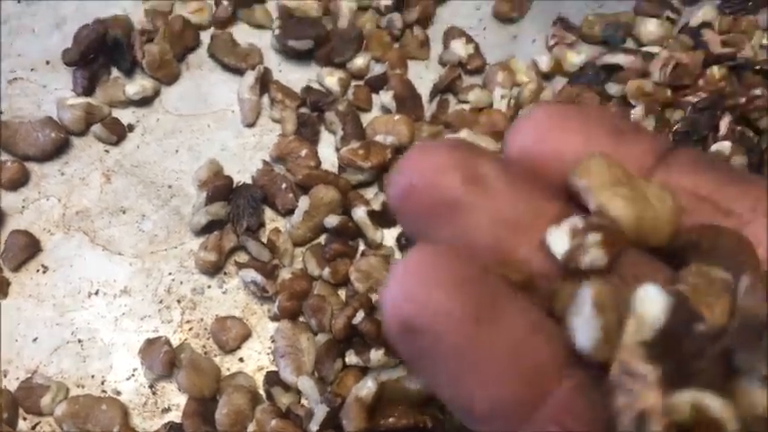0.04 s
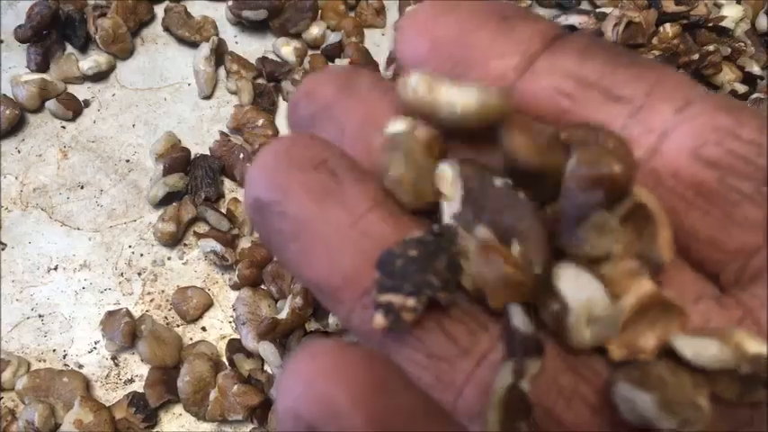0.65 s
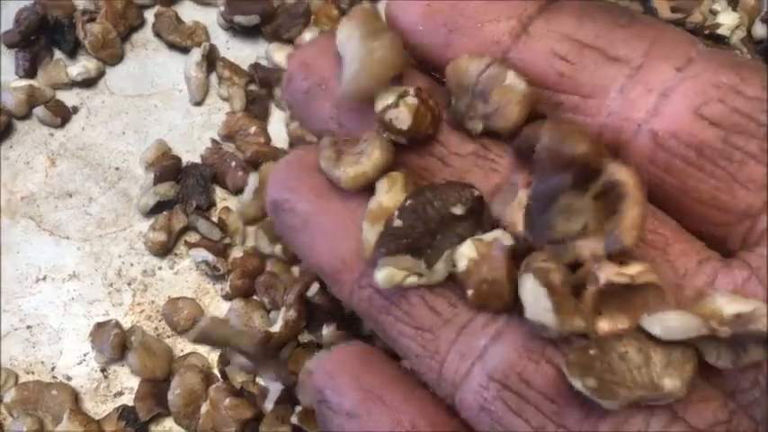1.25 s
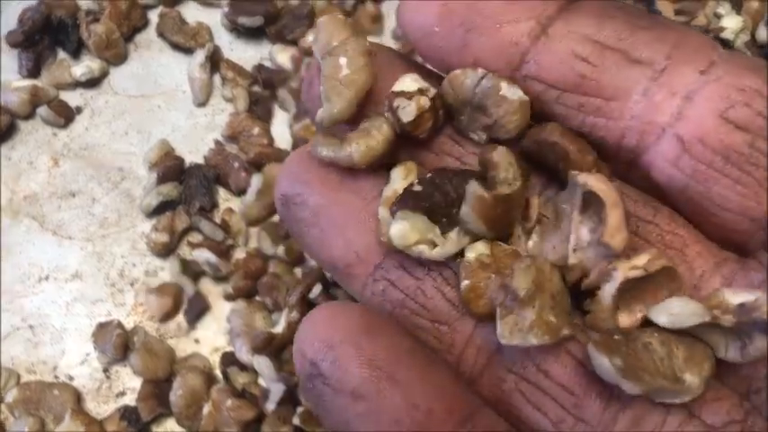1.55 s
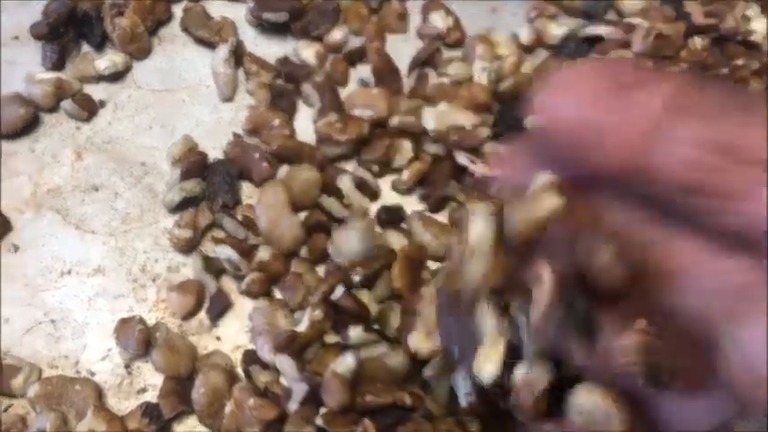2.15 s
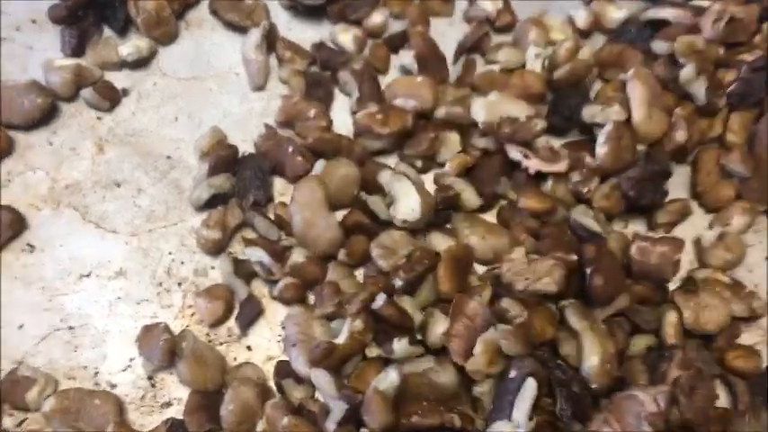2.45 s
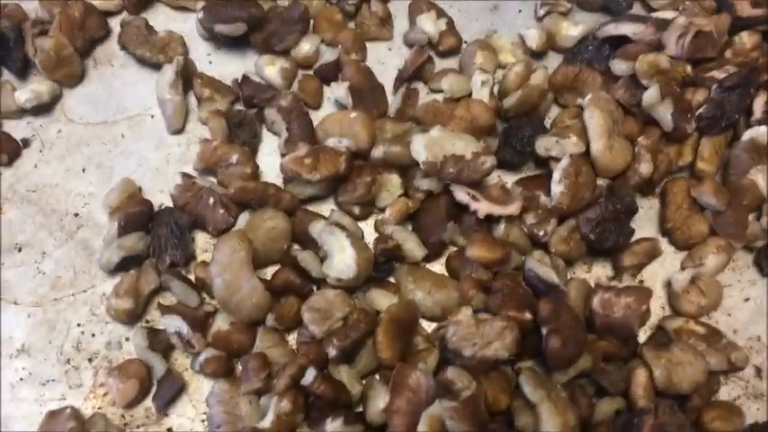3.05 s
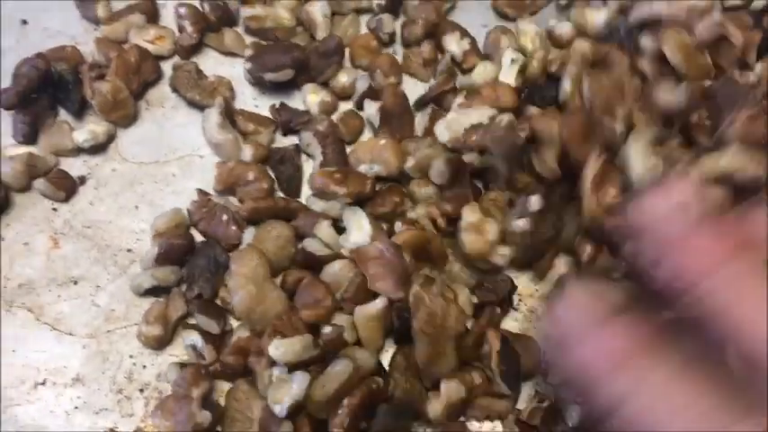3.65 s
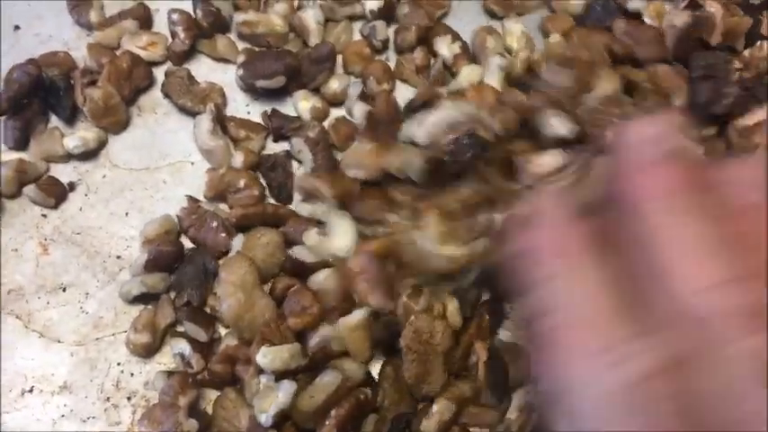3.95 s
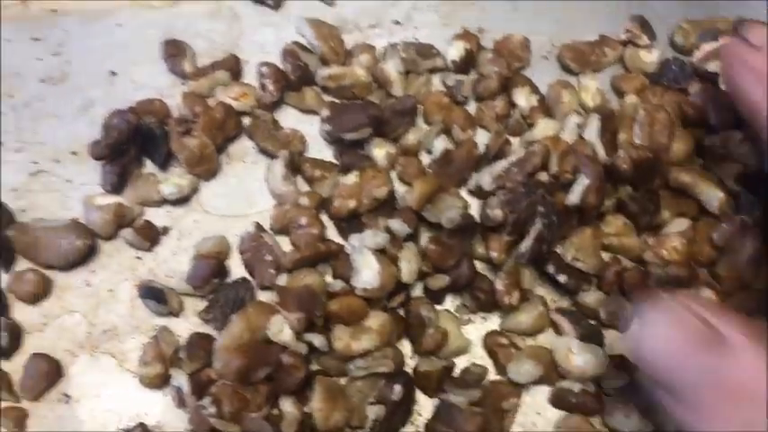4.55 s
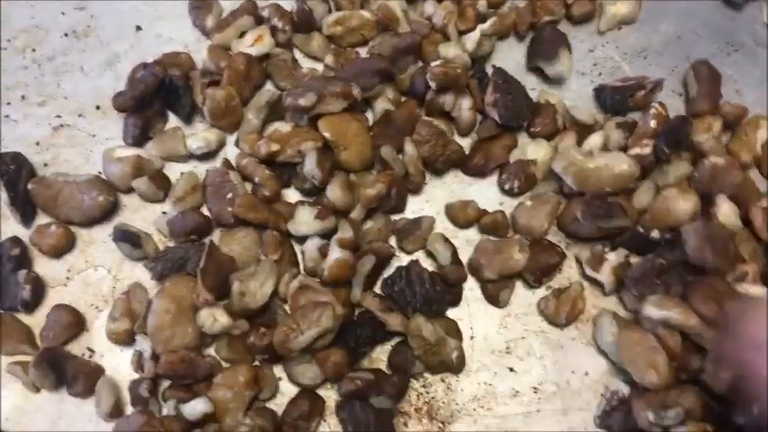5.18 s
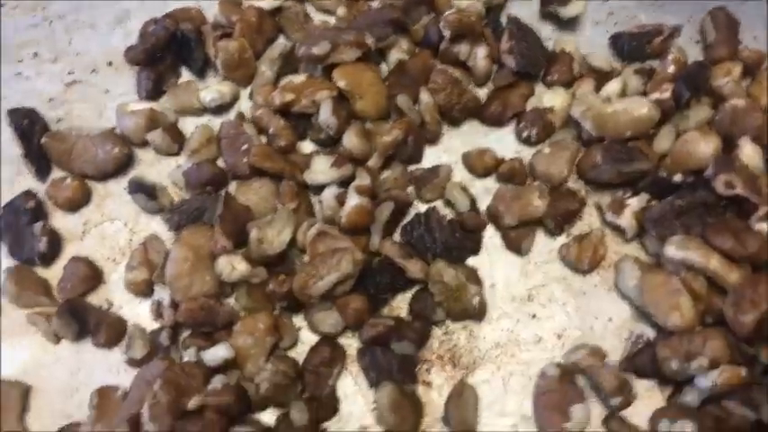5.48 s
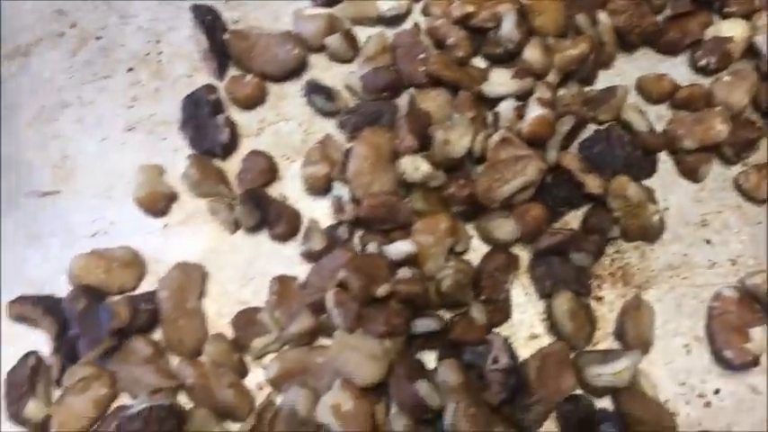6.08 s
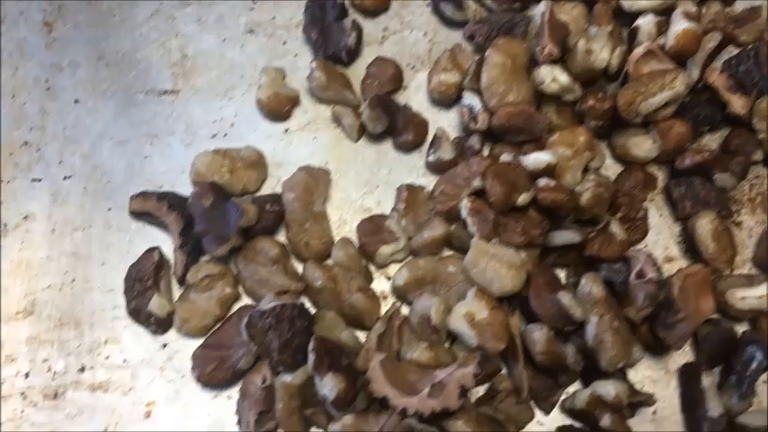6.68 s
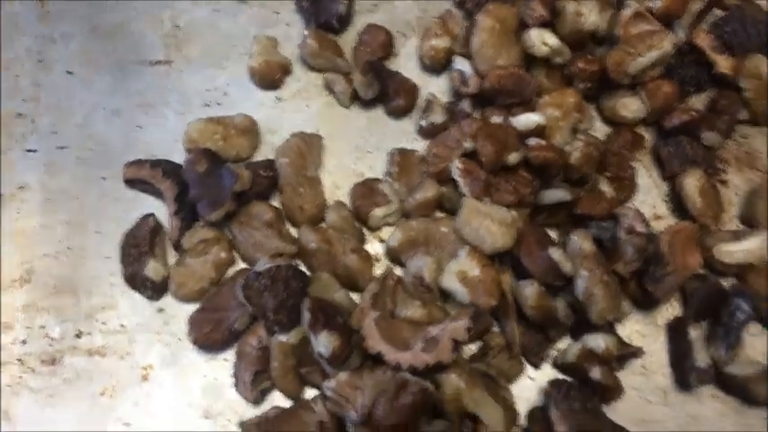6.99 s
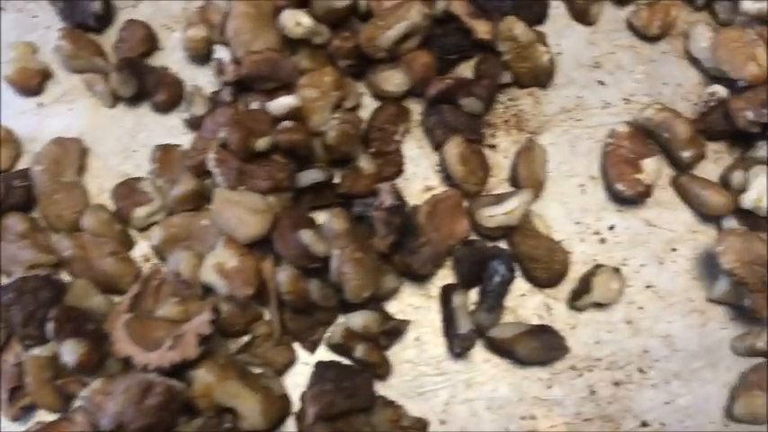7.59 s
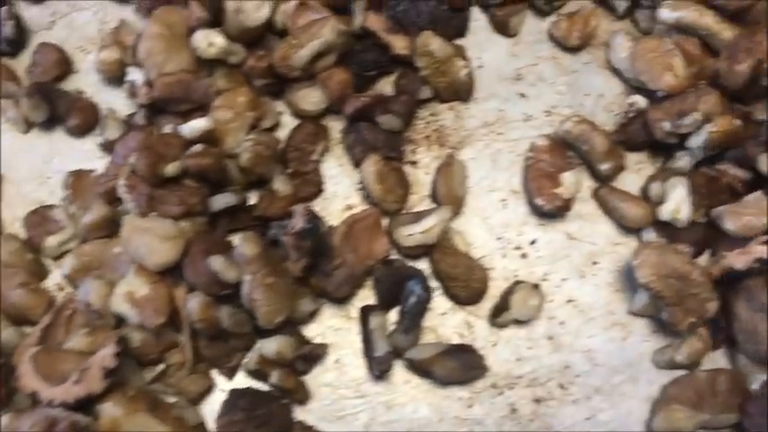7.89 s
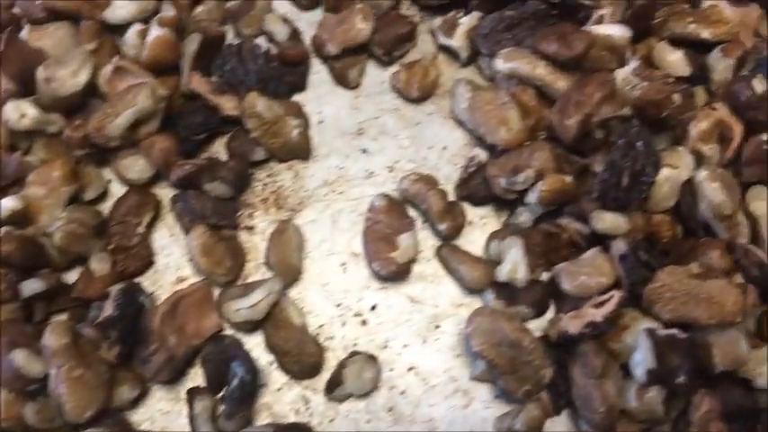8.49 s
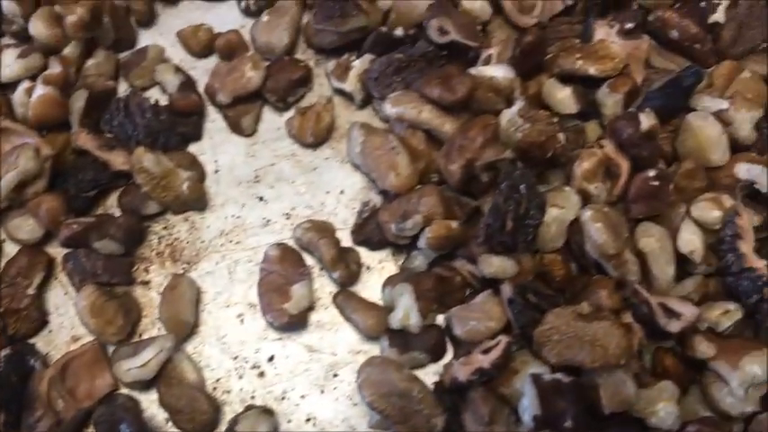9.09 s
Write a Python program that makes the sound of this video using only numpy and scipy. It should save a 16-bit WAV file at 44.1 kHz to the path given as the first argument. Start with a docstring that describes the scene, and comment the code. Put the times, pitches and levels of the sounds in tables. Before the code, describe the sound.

A few dry cracked nut pieces slip off a palm and knock on the bottom of a hard tub, which rings briefly. The rest of the handful drops in a short clatter. Then the hand rakes through the heap in several quick pushes, a dense rattle with sharp clicks of shell on shell. The pieces settle, leaving a faint low hum. Heard close up in a small room.

```python
"""Cracked nuts in a hard tub

Close by, in a small room with a low hum, a few pieces slip off an open palm and knock on the
bottom, making the tub ring. Then the handful is tipped back. The hand rakes through the heap in
a few quick pushes: a dense rattle with sharp clicks of shell on shell, settling after each."""
import sys
import numpy as np
from scipy import signal
from scipy.fft import rfft, irfft, next_fast_len
from scipy.io import wavfile

SR = 44100
rng = np.random.default_rng(int(sys.argv[2]) if len(sys.argv) > 2 else 0)


def put_to_file(sound):
    """Save the sound as 16-bit audio at rate SR, in the file named by the first command-line argument."""
    columns = np.atleast_2d(sound).T  # one column per channel
    safe = np.clip(columns, -1, 1)
    whole_steps = np.round(safe * 32767)
    wavfile.write(sys.argv[1], SR, whole_steps.astype(np.int16))


N = 411453
T = np.arange(N) / SR   # seconds since the scene began
AGE = np.arange(2048) / SR   # seconds since a hit
SHELL_RING_S = .008

# The tub's ringing tones. Each row: pitch in Hz, relative level in dB, seconds to fade by 60 dB.
TUB_TONES = [(251.3, -8.5, 0.23), (579, -10, 0.023), (618, -5, 0.11), (795, -8.5, 0.047), (997, -5.5, 0.06),
             (1300.6, 2, 0.036), (1514, 0, 0.015), (1710, -1, 0.0062), (2053, 0.5, 0.019),
             (2300, -3.5, 0.028), (2684, -1.5, 0.036), (3110, -3.5, 0.035), (3540, -19.5, 0.022)]
# The dry crack of a piece on the tub. Each row: frequency in Hz, relative level in dB.
CRACK_SPECTRUM = [(100, -19), (260, -6), (430, -13), (620, 2.5), (1000, 0), (1500, -2.5), (2100, -5),
                  (3600, -8.5), (4600, -20), (9000, -35)]


def from_db(db):
    """Turn decibels into a factor to multiply by."""
    return 10 ** (np.asarray(db) / 20)


def unit(x):
    """Scale a sound to a total energy of one."""
    return x / np.sqrt(np.sum(x * x) + 1e-20)


def rms_one(x):
    """Scale a sound to an average power of one."""
    return unit(x) * np.sqrt(len(x))


def at_hz(points, hz):
    """Look up a frequency in a table, blending between rows on a scale of octaves."""
    frequencies, values = np.transpose(points)
    return np.interp(np.log(np.maximum(hz, 1)), np.log(frequencies), values)


def colour(x, spectrum):
    """Filter a sound by a list of (Hz, dB) points."""
    n = 2 * next_fast_len(len(x) // 2 + len(AGE))
    gains = from_db(at_hz(spectrum, np.arange(n // 2 + 1) * SR / n))
    cepstrum = irfft(np.log(gains))
    cepstrum[1:n // 2] *= 2   # using only this half, doubled, keeps sound from coming before its hit
    response = np.exp(rfft(cepstrum[:n // 2], n))
    return irfft(rfft(x, n) * response)[:len(x)]


def ring(x, hz, ring_s):
    """Let a sound set off one tone, which fades by 60 dB in ring_s seconds."""
    decay = from_db(-60 / (ring_s * SR))
    angle = 2 * np.pi * min(hz, .45 * SR) / SR
    return signal.lfilter([.5, 0, -.5], [1, -2 * decay * np.cos(angle), decay * decay], x + 1e-18)


def background(air_db=-55.5, hum_db=-2, ring_s=.4):
    """Steady room air and a low hum that wavers."""
    # The hiss of the air. Each row: frequency in Hz, relative level in dB.
    air_spectrum = [(28, -34), (55, -7), (160, -3), (200, -9.5), (380, -11.5), (520, -20.5), (750, -26.5),
                    (1000, -25), (2100, -34.5), (2500, -33.5), (4700, -42), (9000, -41.5), (15000, -37)]
    # The tones of the hum. Each row: pitch in Hz, level in dB before hum_db is added.
    hum_tones = [(64.6, -57.5), (102.3, -64), (150.7, -67.5)]
    air = from_db(air_db) * rms_one(colour(rng.standard_normal(N), air_spectrum))
    noise, hum = rng.standard_normal(N + SR), 0   # an extra second lets the hum build up
    for hz, db in hum_tones:
        tone = ring(ring(noise, hz, ring_s), hz, ring_s)[SR:]
        hum += from_db(db + hum_db) * rms_one(tone)
    return air + hum


def scatter(seconds, echo_db=-17, echo_s=0.012):
    """One contact is a tight cluster of tiny hits that echoes off the tub walls."""
    shape = np.exp(-(AGE / seconds) ** 2) + from_db(echo_db) * np.exp(-AGE / echo_s)
    return unit(rng.standard_normal(len(AGE)) * shape)


def knock(brightness_hz, crack_s=0.0059, ring_db=-4):
    """A piece hits the tub: a dry crack, and tones whose strengths depend on where it lands."""
    touch = scatter(crack_s / 2)
    tones = sum(from_db(db) * unit(ring(touch, hz, ring_s)) * rng.uniform(0.55, 1.5)
                for hz, db, ring_s in TUB_TONES)
    crack = unit(colour(scatter(crack_s), CRACK_SPECTRUM))
    sound = crack + from_db(ring_db) * unit(tones)
    tilt_db = 9 * np.log2(brightness_hz / 1400)   # heavy pieces favour low tones, light ones high
    return unit(colour(sound, [(600, -tilt_db), (3000, tilt_db)]))


def click(pitch_hz, snap_s=.003, ring_db=-3, count=7):
    """Shell hits shell: a bright snap and a few brief tones around the piece's pitch."""
    spectrum = [(pitch_hz / 8, -27), (pitch_hz * .6, -4), (pitch_hz, 0), (pitch_hz * 2, -10)]
    snap = colour(scatter(snap_s), spectrum)
    ratios = np.geomspace(.65, 1.4, count) * rng.uniform(.88, 0.99, count)
    tones = sum(unit(ring(snap, pitch_hz * ratio, SHELL_RING_S)) for ratio in ratios)
    return unit(unit(snap) + from_db(ring_db) * unit(tones))


def single_pieces(gain_db=24, click_hz=7755, db_per_octave=54.5):
    """Each piece that lands or collides sounds both the tub and the shell."""
    # The hits that stand out. Each row: start in seconds, relative knock level in dB,
    # knock brightness in Hz, relative click level in dB.
    contacts = [(0.001, -24, 2140, -71), (0.594, -37.5, 1080, -51), (0.602, -37, 690, -68),
                (0.667, -50.5, 1750, -82), (0.967, -36, 980, -50), (1.429, -18.5, 1260, -56),
                (1.475, -41, 822, -56), (1.501, -40, 1710, -50), (1.522, -32, 1200, -59),
                (1.535, -40.5, 1150, -67), (1.71, -65, 1150, -52.5), (1.748, -72, 881, -46.5),
                (1.865, -17.5, 1210, -33.5), (1.879, -17.5, 1220, -26.5), (2.247, -23.5, 1082, -34),
                (2.288, -27.5, 992, -34), (2.303, -27.5, 886, -47.5), (2.323, -26.5, 1350, -49.5),
                (2.329, -26, 1060, -41.5), (2.336, -21.5, 1390, -39.5), (2.343, -46, 1540, -22),
                (2.373, -20, 1450, -17), (2.383, -18.5, 1410, -43), (2.512, -41.5, 960, -56),
                (2.53, -40, 2020, -55), (2.556, -45, 980, -57), (3.467, -35, 1500, -46),
                (3.603, -38.5, 1980, -14.5), (3.624, -20, 2037, -18.5), (3.644, -22, 2157, -18.5),
                (3.696, -21.5, 1540, -34.5), (3.756, -28.5, 1870, -19), (3.761, -26, 1985, -21),
                (3.774, -42, 1840, -26.5), (4.023, -25.5, 2410, -14), (4.101, -25.5, 2080, -18),
                (4.141, -26.5, 1550, -16), (4.193, -29.5, 1428, -22.5), (4.257, -29.5, 1750, -28.5),
                (4.323, -26.5, 1900, -25), (4.344, -15.5, 1806, -27), (4.361, -13, 2033, -12.5),
                (4.475, -35, 1990, -25), (4.499, -31, 1860, -23.5), (4.533, -23.5, 2140, -18),
                (4.579, -28, 2140, -14), (4.614, -32.5, 1735, -64), (4.685, -39.5, 1084, -67.5),
                (4.717, -29, 1920, -34.5), (4.976, -20.5, 1586, -41), (4.994, -19, 2275, -13.5),
                (5.058, -21, 2110, -30.5), (5.075, -23.5, 1780, -17.5), (5.132, -16, 2450, -14.5),
                (5.231, -25, 2280, -23), (5.28, -25, 1070, -32.5), (5.294, -29, 750, -54.5),
                (5.362, -28.5, 870, -73), (5.381, -28, 840, -67), (5.441, -37, 1220, -70),
                (5.465, -30.5, 810, -65), (7.76, -70, 2400, -70)]
    out = np.zeros(N + len(AGE))
    for start_s, knock_db, brightness_hz, click_db in contacts:
        at = round(start_s * SR)
        # a glancing hit has more click than knock, and clicks higher the more that is so
        pitch_hz = click_hz * 2 ** ((click_db - knock_db) / db_per_octave)
        out[at:at + len(AGE)] += from_db(knock_db + gain_db) * knock(brightness_hz)
        out[at:at + len(AGE)] += from_db(click_db + gain_db) * click(pitch_hz)
    return out[:N]


def collisions(per_s, spread_db):
    """Hits at random moments, most of them small."""
    at = np.flatnonzero(rng.random(N) < per_s / SR)
    size, sign = rng.random((len(at), 2)).T
    hits = np.zeros(N)
    hits[at] = from_db(spread_db * np.minimum(-np.log(size), 3)) * np.sign(sign - .5)
    return hits


def swell(middle_s, half_s):
    """A smooth rise to one and back down."""
    return np.exp(-np.minimum(((T - middle_s) / half_s) ** 2, 50))


def palm_rustle(gain_db=-3, held_db=-73.5, held_until_s=2.25):
    """Dry pieces rustle faintly while they lie on the palm, and more as they slide over the skin."""
    # The slides. Each row: middle in seconds, half length in seconds, relative level in dB.
    slides = [(0.29, 0.057, -61.5), (0.5, 0.058, -69), (0.656, 0.025, -58), (0.793, 0.069, -54.5),
              (1.14, .04, -65), (1.38, 0.1, -60), (1.83, 0.16, -55), (2.186, 0.084, -59.5),
              (2.732, 0.091, -64.5), (5.8, 0.055, -64), (6.6, .04, -68)]
    # Shell rubbing on skin. Each row: frequency in Hz, relative level in dB.
    skin_spectrum = [(2000, -3.5), (4500, -8.5), (6000, 0), (9000, 0.5), (10500, -3.5), (12500, 5),
                     (16000, -4)]
    held = from_db(held_db) * (T < held_until_s)
    sliding = sum(from_db(db) * swell(middle_s, half_s) for middle_s, half_s, db in slides)
    grains = rms_one(colour(collisions(per_s=2500, spread_db=5), skin_spectrum))
    return from_db(gain_db) * (held + sliding) * grains


def push(start_s, attack_s, length_s, sag_db_per_s, settle_db_per_s):
    """The heap gathers speed, sags as the hand slows, and settles once the hand stops."""
    age = T - start_s
    sag_db = sag_db_per_s * np.maximum(age - attack_s, 0)
    settle_db = settle_db_per_s * np.maximum(age - length_s, 0)
    return np.clip(age / attack_s, 0, 1) * from_db(-np.minimum(sag_db + settle_db, 120))


def tub_rattle(crack_db=-2):
    """Many pieces tumble over the bottom, all setting off the same tones of the tub."""
    hits = collisions(per_s=1200, spread_db=3)
    at = np.flatnonzero(hits)
    drive, tones = np.zeros(N), 0
    for hz, db, ring_s in TUB_TONES:
        drive[at] = hits[at] * rng.standard_normal(len(at))   # each landing spot favours other tones
        tones += from_db(db) * unit(ring(drive, hz, ring_s))
    cracks = unit(colour(hits, CRACK_SPECTRUM))
    return rms_one(unit(tones) + from_db(crack_db) * cracks)


def crackle(hits, decay_s=0.0018):
    """Each hit becomes a brief noisy snap."""
    energy = signal.lfilter([1], [1, -np.exp(-1 / (decay_s * SR))], hits ** 2 + 1e-18)
    return np.sqrt(energy) * rng.standard_normal(N)


def shell_rattle(count=16):
    """Shells of many pitches bump together inside the heap, snapping and ringing."""
    # The jostling shells. Each row: frequency in Hz, relative level in dB.
    shell_spectrum = [(2500, -1), (4000, -3), (5700, -1), (7400, -6), (9500, -6), (11500, -9),
                      (15500, -13.5)]
    hits = collisions(per_s=3000, spread_db=4)
    which_shell = rng.integers(0, count, N)
    pitches_hz = np.linspace(2600, 15500, count)
    rings = sum(ring(hits * (which_shell == k), hz, SHELL_RING_S) for k, hz in enumerate(pitches_hz))
    snaps = signal.sosfilt(signal.butter(2, 2500, "high", fs=SR, output="sos"), crackle(hits))
    return rms_one(colour(unit(rings) + unit(snaps), shell_spectrum))


def raking(tub_db=-2, shell_db=-1, rumble_db=-15.5):
    """The hand pushes the heap along: the tub rattles, shells jostle and the whole pile rumbles."""
    # The pushes. Each row: start, rise time and length in seconds, relative levels of
    # tub rattle and shell jostle in dB, rates of sagging and settling in dB per second.
    strokes = [(3.46, 0.047, 0.3, -25, -24, 11, 164), (3.88, .17, .31, -24.5, -22, 7, 100),
               (4.295, 0.052, 0.13, -25, -19.5, 35, 70), (4.706, 0.052, 0.37, -25, -21, 19.5, 150),
               (5.062, 0.062, 0.14, -26.5, -23, 25, 120), (5.377, 0.073, 0.086, -45.5, -54, 11, 221)]
    # The rumble of the pile. Each row: frequency in Hz, relative level in dB.
    pile_spectrum = [(30, -16.5), (55, -5), (110, -5.5), (170, -8), (250, 1), (310, -6), (400, -13),
                     (700, -25.5)]
    on_tub, jostle = 0, 0
    for start_s, attack_s, length_s, rattle_db, jostle_db, sag, settle in strokes:
        motion = push(start_s, attack_s, length_s, sag, settle)
        on_tub += from_db(rattle_db) * motion
        jostle += from_db(jostle_db) * motion ** 1.56   # the heap quiets before pieces on the bottom
    pile = rms_one(colour(collisions(per_s=1500, spread_db=1.9), pile_spectrum))
    rumble = from_db(rumble_db) * np.sqrt(on_tub * jostle) * pile
    rattle = from_db(tub_db) * on_tub * tub_rattle()
    shells = from_db(shell_db) * jostle * shell_rattle()
    return rattle + shells + rumble


def scraping(ring_cycles=9):
    """A piece dragged along the bottom under the fingers judders and rings at its own pitch."""
    # The drags. Each row: middle in seconds, half length in seconds, pitch in Hz, level in dB.
    scrapes = [(4.363, 0.029, 1400, -23), (4.44, 0.052, 1354, -26.5), (4.775, 0.037, 2750, -25.5),
               (4.781, 0.041, 5676, -25.5), (7.439, .06, 1206, -68)]
    slips, out = collisions(per_s=1500, spread_db=1.5), np.zeros(N)
    for middle_s, half_s, hz, db in scrapes:
        near = np.abs(T - middle_s) < np.pi * half_s
        judder = rms_one(ring(slips[near], hz, ring_cycles / hz))
        out[near] += from_db(db) * swell(middle_s, half_s)[near] * judder
    return out


def room(x, early_db=-1, early_s=0.0083, build_s=.004):
    """A wash of echoes, strongest at first around the tub; each frequency band fades at its own pace."""
    # How long echoes last. Each row: frequency in Hz, seconds to fade by 60 dB.
    fade_times = [(200, .28), (700, 0.39), (1500, 0.3), (3500, 0.4), (8000, 0.095), (15000, .22)]
    # How strong echoes are. Each row: frequency in Hz, level in dB.
    echo_levels = [(200, -11), (700, -11), (1500, -9), (3500, -8), (8000, -12.5), (15000, -13.5)]
    age, response = np.arange(SR // 2) / SR, 0
    early = from_db(early_db) * np.exp(-age / early_s)
    build_up = 1 - np.exp(-(age / build_s) ** 2)
    edges_hz = np.geomspace(100, 18000, 10)
    for low, high in zip(edges_hz, edges_hz[1:]):
        hz = np.sqrt(low * high)
        band_filter = signal.butter(2, [low, high], "band", fs=SR, output="sos")
        band = signal.sosfilt(band_filter, rng.standard_normal(len(age)))
        fade = from_db(-60 * age / at_hz(fade_times, hz))
        response += from_db(at_hz(echo_levels, hz)) * band * unit((fade + early) * build_up)
    return signal.fftconvolve(x, response)[:N]


def scene(shift_hz=7, count=2):
    """Mix the nuts, their echoes and the background into one channel."""
    rustle = raking() + scraping() + palm_rustle()
    # a hit sounds different in each direction; the first direction faces the listener
    directions = [single_pieces() for _ in range(count)]
    out = directions[0] + rustle + background()
    for k, contacts in enumerate(directions):
        path = np.cos(np.pi * (2 * shift_hz * T + k / count))   # echo paths shift as the heap moves
        out += room(contacts / np.sqrt(count) + path * rustle)
    return out[None]


def record(dry, cutoff_hz=16000):
    """Round off the tallest peaks and cut the very highest treble."""
    rounded = 1.5 * np.tanh(dry / 1.5)
    return signal.sosfilt(signal.ellip(12, .1, 80, cutoff_hz, fs=SR, output="sos"), rounded)


dry = scene()
out = record(dry)
put_to_file(out)
```